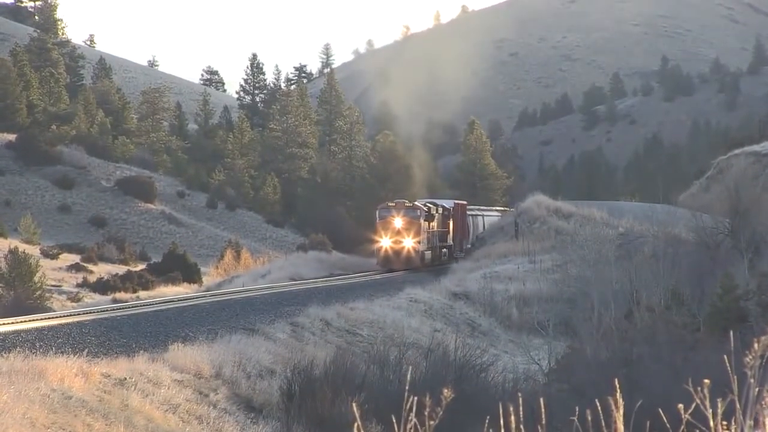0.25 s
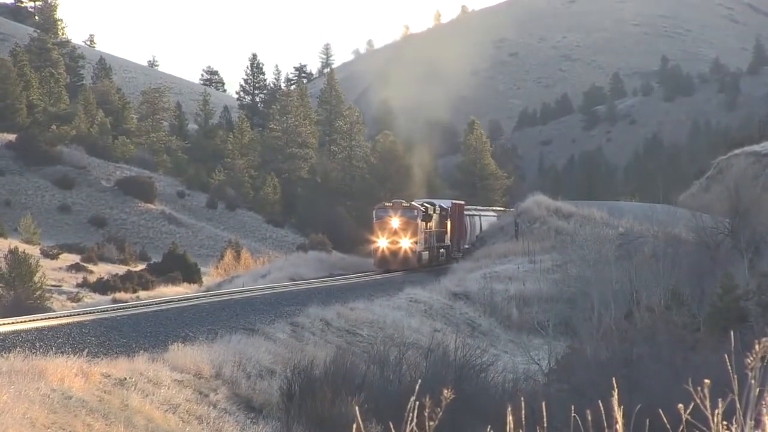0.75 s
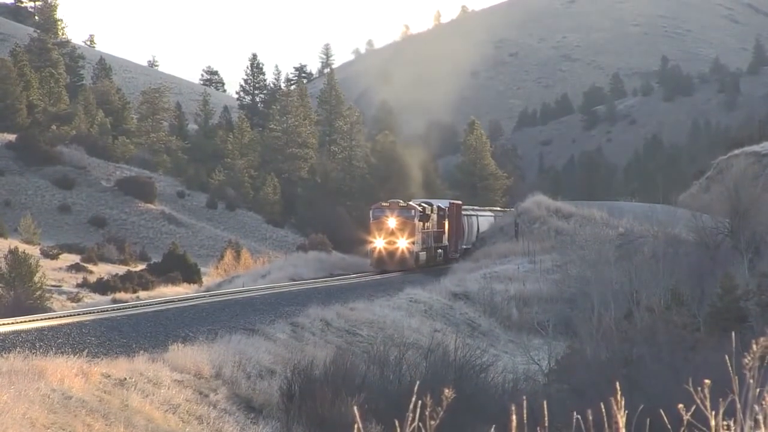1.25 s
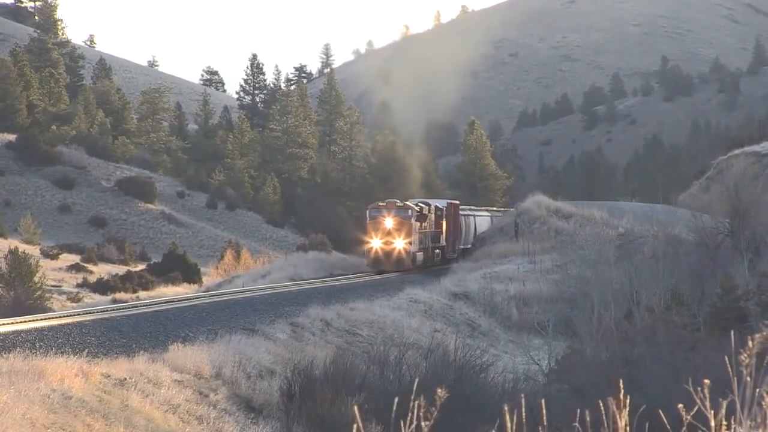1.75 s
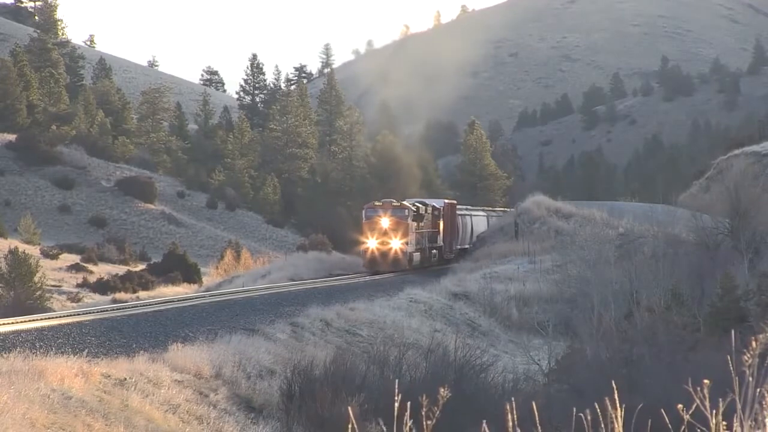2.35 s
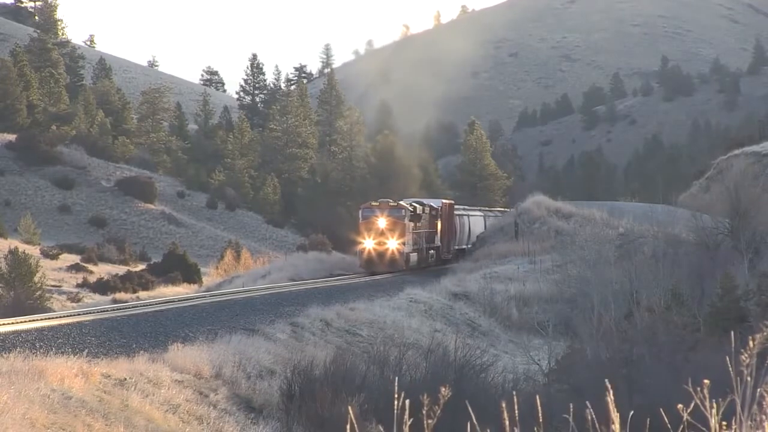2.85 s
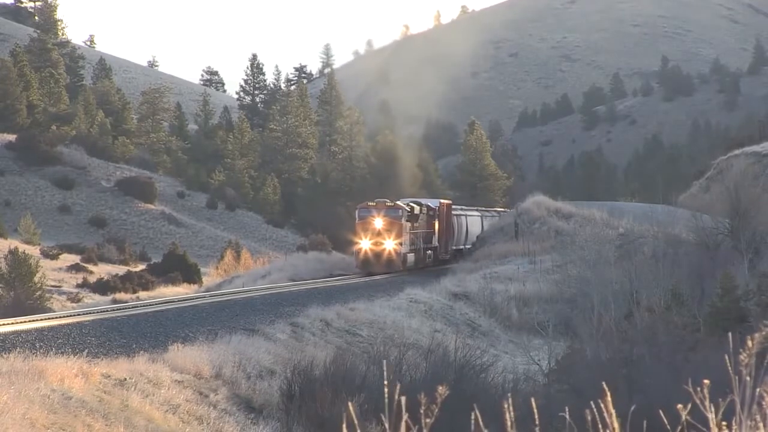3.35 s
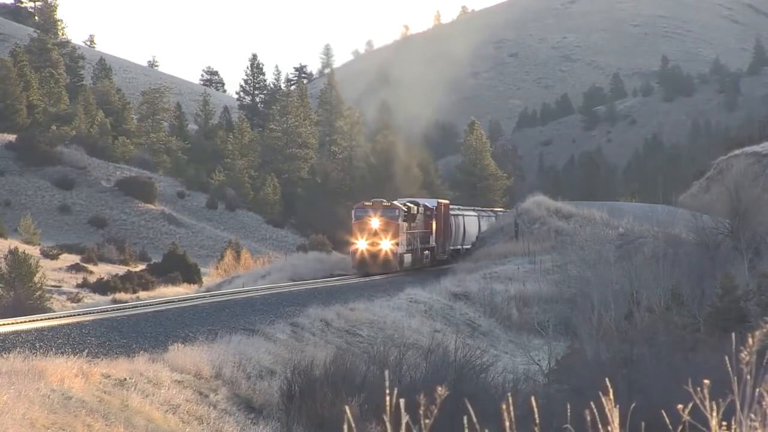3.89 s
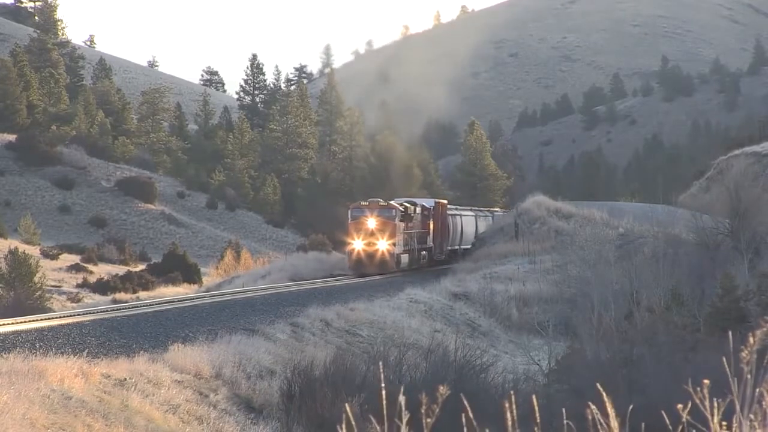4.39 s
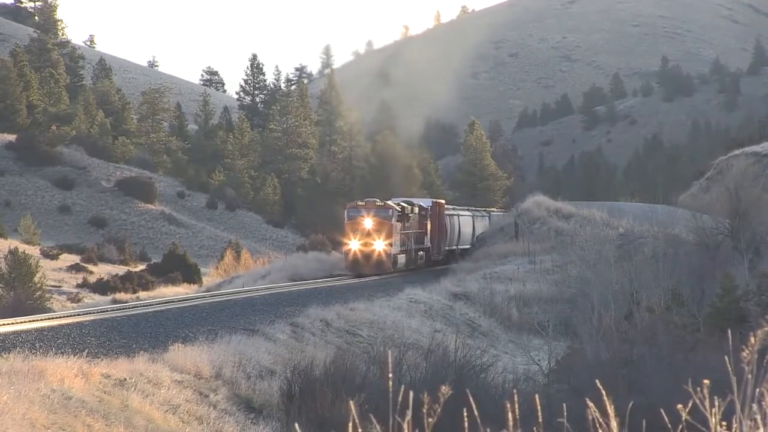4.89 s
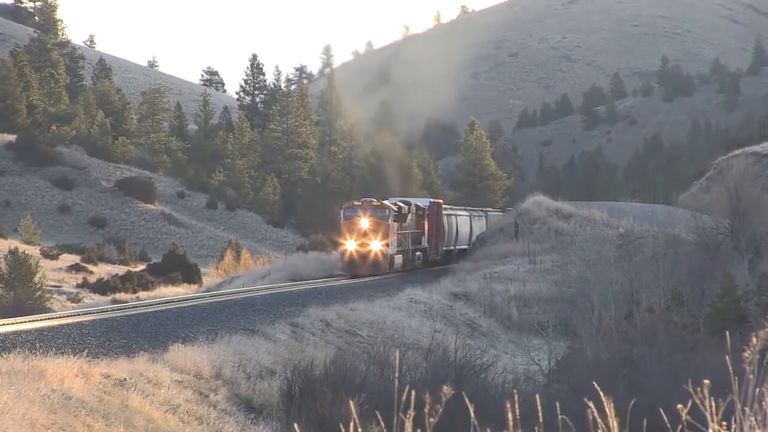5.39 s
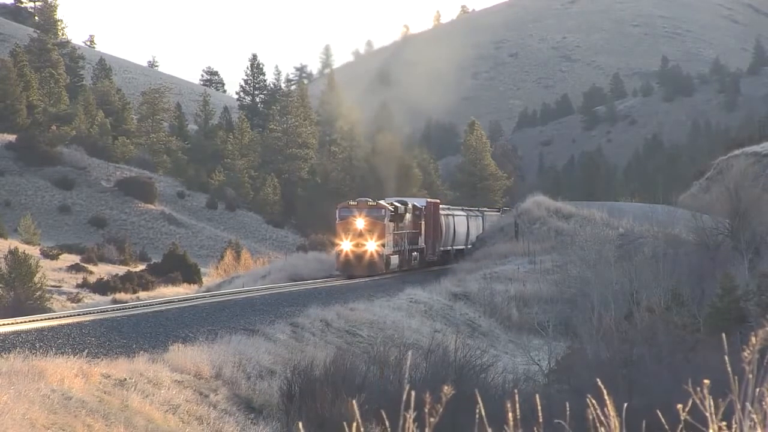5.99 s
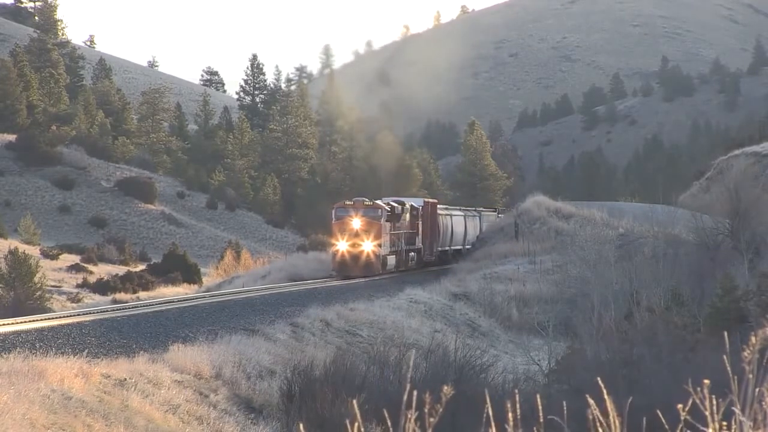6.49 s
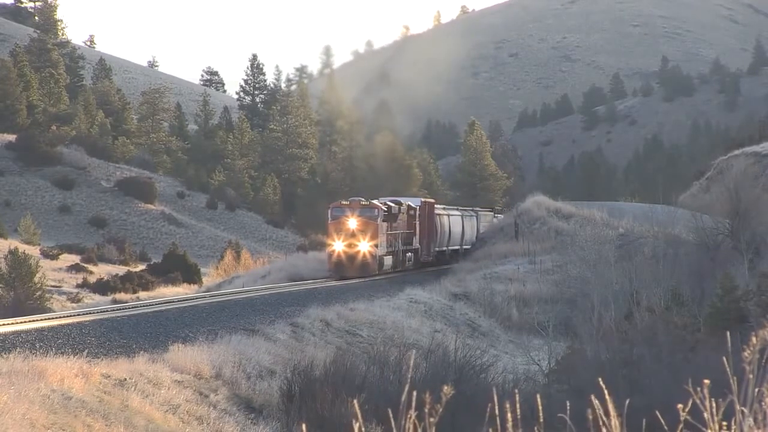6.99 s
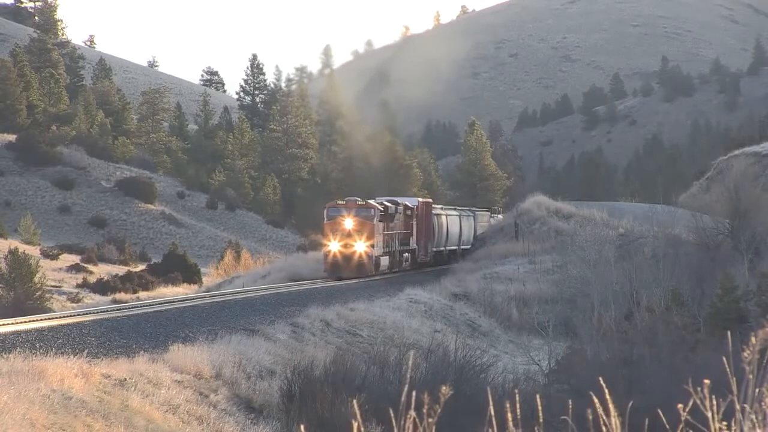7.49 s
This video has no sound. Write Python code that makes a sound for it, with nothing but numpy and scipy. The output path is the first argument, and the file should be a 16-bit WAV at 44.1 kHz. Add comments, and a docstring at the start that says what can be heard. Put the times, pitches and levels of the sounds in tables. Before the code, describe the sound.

Outdoors in an open dry valley, distant diesel locomotives pull hard, giving a continuous low throbbing drone and broad breathy exhaust roar that slowly swells. A thin wavering whine comes and goes. Dry grass rustles softly near the microphone, mostly in the first two seconds, with a sharp stalk tick just before two. A small bird trills around three seconds.

```python
"""Diesel freight locomotives at full throttle climb slowly nearer through a dry valley, far from the microphone.
From the start, uneven firings give clean low orders under a broad exhaust roar of noise bands with two echoes,
a wavering sine makes a thin whine, and close by noise gusts rustle in dry grass.
From 1.4 s stalks tick as short clicks; from 1.5 s the first echo gap in the roar climbs.
Around 3 s a small bird trills in gliding sines; two faint high chips follow near 6 and 7 s."""
import sys
import numpy as np
from scipy import signal
from scipy.fft import rfft, irfft, next_fast_len
from scipy.io import wavfile
from scipy.ndimage import uniform_filter1d

SR = 44100
rng = np.random.default_rng(int(sys.argv[2]) if len(sys.argv) > 2 else 0)


def wrap_up_sound(samples):
    """Save the sound to the file named by the first command line argument, as 16-bit audio."""
    columns = np.atleast_2d(samples).T
    # keep every value between -1 and 1, then stretch to whole-number steps
    tamed = np.clip(columns, -1, 1)
    steps = np.round(tamed * 32767).astype(np.int16)
    wavfile.write(sys.argv[1], SR, steps)


N = 341334
T = np.arange(N) / SR
CYCLE_HZ = 8.9259  # four-stroke cycles a second as they arrive


def undb(db):
    """Decibels to gain."""
    return 10 ** (np.asarray(db) / 20)


def columns(table):
    """Every column after the first, drawn out along the time axis."""
    times, *rest = np.transpose(table)
    return [np.interp(T, times, column) for column in rest]


def walk(rate_hz):
    """Random levels held 1 / rate_hz seconds and slewed twice; spread near 1."""
    steps = 16
    held = np.repeat(rng.standard_normal(int(N / SR * rate_hz) + 2), steps)
    slewed = uniform_filter1d(uniform_filter1d(held, size=steps), size=steps)
    return np.interp(T * rate_hz * steps, np.arange(len(held)), slewed) * 4 / 3


def bump(middle_s, before_s, after_s):
    """A smooth swell from 0 to 1 at middle_s and back."""
    distance = np.where(T < middle_s, (middle_s - T) / before_s, (T - middle_s) / after_s)
    return np.cos(np.pi / 2 * np.clip(distance, 0, 1)) ** 2


def noise_bands(colour, count):
    """Overlapping bands, count an octave, of one coloured noise, as (centre Hz, sound); together they have rms 1."""
    size = next_fast_len(N)
    octave = np.log2(np.maximum(np.arange(size // 2 + 1), 1) * SR / size)
    hz, db = np.transpose(colour)
    tint = undb(np.interp(octave, np.log2(hz), db, left=-90, right=-90))
    spectrum = rfft(rng.standard_normal(size)) * tint
    spectrum /= np.std(irfft(spectrum, size))
    for centre in np.arange(np.log2(hz[0]), np.log2(hz[-1]) + 1 / count, 1 / count):
        window = np.clip(1 - abs(octave - centre) * count, 0, 1)
        yield 2 ** centre, irfft(spectrum * window, size)[:N]


# twelve cylinders, two banks of six: place of the puff in the cycle/0-1, level/dB
CYLINDER_PUFFS = [(.0852, -3), (.1314, .4), (.2471, 1.9), (.3013, -2.9), (.415, -3.5), (.4612, -3.7),
                  (.5825, 3.8), (.6275, -7.5), (.7468, 2.6), (.7924, 2.4), (.9217, 5.5), (.965, 3.9)]
# resonances that shape the balance and timing of the engine orders: f/Hz, width/Hz, level/dB, sign
ORDER_RESONANCES = [(35, 74.3, -32.6, 1), (79.6, 19.4, -11.6, -1), (131.4, 8, -6.8, 1),
                    (169.7, 8, -18.8, 1), (191.3, 14.8, -23.1, -1), (234.4, 8, -28.7, -1)]
BASS_CUT_HZ = 45  # the engine sound thins out below this


def order(k):
    """Size and timing of multiple k of the cycle: all twelve puffs summed, then shaped by the resonances."""
    place, strength_db = np.transpose(CYLINDER_PUFFS)
    hz = k * CYCLE_HZ
    puffs = undb(strength_db) @ np.exp(-2j * np.pi * k * place)
    shape = 0
    for f, width, db, sign in ORDER_RESONANCES:
        damping = 1j * hz * width
        shape = shape + sign * undb(db) * damping / (f * f - hz * hz + damping)
    low = 1j * hz / BASS_CUT_HZ
    bass_cut = low ** 2 / (1 + np.sqrt(2) * low + low ** 2)
    return puffs * shape * bass_cut


# the train draws nearer, drive of order 15 ahead of the resonances: t/s, level/dB
APPROACH_LEVEL = [(0, -39.5), (1.1, -37.5), (1.6, -38), (2.05, -38), (2.5, -36.5), (2.9, -35), (4.2, -34.5),
                  (4.7, -34.5), (5.6, -35), (6.4, -34.5), (7.74, -33.5)]
# single orders fade or swell for a while: middle t/s, time each way/s, level/dB
ORDER_FADES = [(1.1, .8, -7), (1.3, 1.3, -7.5), (2.6, 0.85, -2), (1.9, 1.9, 4.5), (5.4, 0.43, -6),
               (7.3, 1, 8), (2.5, 0.83, -6.5), (7.5, 1.1, -8), (0.79, 1.4, 1), (2.7, 1.1, -4.5)]
# the multiple of the cycle that each row of fades acts on: order
FADED_ORDERS = (9, 11, 6, 8, 11, 8, 13, 13, 16, 14)
ORDERS_HEARD = range(3, 31)
OPEN_DB = -33  # drive of order 15 at which all orders keep the balance set by puffs and resonances
FULL_RISE_ORDER, RISE_POWER = 14, 0.97  # orders below this one gain less as the train comes out into the open
WAVER_DB = .5  # how much order 15 wavers


def engine(cycle, waver_rad=0.055):
    """Twelve uneven firings a cycle sound as steady orders that grow as the train nears."""
    near_db, = columns(APPROACH_LEVEL)
    out = 0
    for k in ORDERS_HEARD:
        rise_share = min(k / FULL_RISE_ORDER, 1) ** RISE_POWER
        level_db = OPEN_DB + (near_db - OPEN_DB) * rise_share
        for faded, (middle_s, each_way_s, db) in zip(FADED_ORDERS, ORDER_FADES):
            if faded == k:
                level_db = level_db + db * bump(middle_s, each_way_s, each_way_s)
        # air on the long path makes each order waver, the higher ones more
        level_db = level_db + WAVER_DB * k / 15 * walk(2.984)
        phase = 2 * np.pi * k * cycle + waver_rad * k / 15 * walk(4.4)
        source = order(k)
        out = out + np.sqrt(2) * undb(level_db) * abs(source) * np.cos(phase + np.angle(source))
    return out


# moves of the roar: t/s, level/dB re its steady rise, then re that level: treble/dB and
# the bands near 1200, 1800, 720 and 540 Hz/dB; strength of first and second echo/0-1
ROAR_MOVES = [(0, -1.8, -0.5, 1.5, -3, 0.5, -2, 0.48, 0.36), (.2, -.5, -2, 1, -1, -0.5, 2, 0.74, .34),
              (.38, -0.1, 1.5, 1.5, 2, 2, 0.5, 0.54, .35), (.52, 0.4, -.5, 1, -2, 4, -6, .6, .36),
              (.7, -0.5, -1, 0.5, -0.5, 2, -3.5, 0.46, .37), (1.1, -0.9, -2.5, 1, -2, 1, 2.5, 0.51, 0.37),
              (1.4, -0.43, -1, 0, -1.5, 2, -2, 0.59, 0.37), (1.8, -0.3, -3.5, 2, -1, 0, -1.1, 0.42, 0.31),
              (2.2, -0.6, -0.5, 4, -0.5, 0.5, 0.5, 0.2, .25), (2.5, -1.5, -1, 3.5, -2, 0, -3, 0.42, 0.21),
              (2.68, -1.2, 2.5, 2, -1, 0.5, -1, .3, 0.24), (2.87, -1.2, 1.5, -1, -1, 1, -1.5, 0.3, 0.26),
              (3.05, -1.4, -4, 1.5, 1.5, -0.5, 0, .22, .23), (3.6, -1.5, -3, 1, -1, 0, -2.5, .33, .23),
              (4.0, -2.5, -2, 3.5, 0, 3.5, -3, 0.43, .15), (4.45, -1.3, -2, 2, -1, 2, -3, 0.47, .11),
              (4.9, -1.5, -5, 4, 1.5, 0.5, -1, 0.3, .12), (5.3, -0.63, -1.5, 0.5, 3, -1, 1.6, 0.49, .16),
              (6, -0.3, -3, -2, -1.5, -1, 1, 0.39, 0.34), (6.8, 0.1, -4, 0.5, -2.5, -4, 1.5, 0.27, .38),
              (7.74, 1.1, -3, -2, -1, -6, 1.5, .27, 0.26)]
# the top of the roar, near 4500 Hz, swells on its own: t/s, level/dB
ROAR_TOP_SWELL = [(0, 0), (.3, -1), (.8, 1.5), (1.4, -1.5), (1.85, 2), (2.15, -3.5), (2.5, 2), (2.8, -1),
                  (3.2, 1.5), (3.6, 0.5), (3.9, 3.5), (4.4, 2), (4.9, 1), (5.4, 0), (6, 0), (6.8, 0.5),
                  (7.3, -1.5), (7.74, 3)]
# bands that swell on their own, the top one last: f/Hz, width/octaves
SWELLING_BANDS = [(1230, 0.17), (1780, 0.21), (710, 0.16), (546, 0.12), (4500, .2)]
# colour of the roar: f/Hz, level/dB per Hz
ROAR_COLOUR = [(25, -25), (45, -10.5), (70, 2.5), (130, 1.5), (170, 0), (230, 0), (310, -6.5), (520, -8.5),
               (800, -14.5), (1100, -19), (1300, -19.5), (1600, -24.5), (2200, -28), (3000, -32),
               (3800, -37), (4500, -41), (5000, -47), (5500, -55), (7000, -74.5)]
ROAR_DB, ROAR_RISE_DB_S = -43, 0.4  # level at the start ahead of moves and echoes, and its rise
# first gap, cut by the ground echo; it climbs once the train rounds the bend
GAP_HZ, GAP_RISE_HZ_S, GAP_STARTS_S = 488, 124, 1.52
# a second echo, whose gap sinks to a floor
SECOND_GAP_HZ, SECOND_FALL_HZ_S, SECOND_STARTS_S, SECOND_LOW_HZ = 1200, 164, 0.62, 412


def roar(cycle, flicker_db=1.74, puff=0.083, treble_hz=1720.0, mirror_hz=253.0, reach=1.4,
         second_reach=1.3, second_floor=0.39, surge_db=0.6, calm_hz=1500.):
    """Exhaust gas and fans, pulsing a little with the firings, heard directly and again off ground and slope."""
    swell_db, treble_db, *bands_db, strength, second_strength = columns(ROAR_MOVES)
    bands_db = bands_db + columns(ROAR_TOP_SWELL)
    gap_hz = GAP_HZ + GAP_RISE_HZ_S * np.maximum(T - GAP_STARTS_S, 0)
    second_fall_hz = SECOND_FALL_HZ_S * np.maximum(T - SECOND_STARTS_S, 0)
    second_hz = np.maximum(SECOND_GAP_HZ - second_fall_hz, SECOND_LOW_HZ)
    treble_db = treble_db + surge_db * walk(7.0)  # the whole treble surges together
    direct, ground, slope = 0, 0, 0
    for hz, band in noise_bands(ROAR_COLOUR, count=8):
        band_db = treble_db / (1 + (treble_hz / hz) ** 4)
        # each band flickers by itself, less above calm_hz
        band_db = band_db + flicker_db * walk(4.0) * min(calm_hz / hz, 1) ** .5
        for db, (f, width) in zip(bands_db, SWELLING_BANDS):
            band_db = band_db + db * np.exp(-.5 * (np.log2(hz / f) / width) ** 2)
        band = undb(band_db) * band
        direct = direct + band
        # only the middle of the spectrum is mirrored; higher up turbulence blurs the echoes
        mirrored = band / (1 + (mirror_hz / hz) ** 4)
        ground = ground + mirrored / (1 + (hz / (reach * gap_hz)) ** 6)
        slope_top = 1 + (hz / (second_reach * second_hz)) ** 6
        slope_bottom = 1 + (second_floor * second_hz / hz) ** 6
        slope = slope + mirrored / slope_top / slope_bottom
    # grazing echoes are inverted: each cuts a gap where its lag is one period and lifts the bands on either side
    echo = np.clip(strength, 0, 1) * np.interp(T - 1 / gap_hz, T, ground)
    echo = echo + np.clip(second_strength, 0, 1) * np.interp(T - 1 / second_hz, T, slope)
    pulsing = 1 + puff * (np.cos(2 * np.pi * 3 * cycle) + np.cos(2 * np.pi * 6 * cycle))
    return undb(ROAR_DB + ROAR_RISE_DB_S * T + swell_db) * pulsing * (direct - echo)


# level of the whine ahead of its flicker: t/s, level/dB
WHINE_LEVEL = [(0, -77), (.5, -70.5), (1.2, -80), (1.6, -74), (1.9, -75), (2.35, -74), (2.65, -68),
               (3.1, -81), (3.35, -68.5), (3.6, -76), (4.1, -67), (5.65, -66.5), (6.2, -71.5), (6.6, -70),
               (7.0, -68.5), (7.74, -72)]
WHINE_HZ = 1482.5


def whine(flicker_db=2.5, waver_hz=2.5):
    """A thin gear or blower tone, one sine with wavering pitch, that comes and goes."""
    hz = WHINE_HZ + waver_hz * walk(3.0)
    level_db = columns(WHINE_LEVEL)[0] + flicker_db * walk(8.0)
    return np.sqrt(2) * undb(level_db) * np.sin(2 * np.pi * np.cumsum(hz) / SR)


# gusts in the grass, ahead of gain and tilt: loudest t/s, length/s, peak level/dB
GRASS_GUSTS = [(.01, .2, -84), (0.34, .36, -81.5), (.5, .1, -84.5), (1.06, .24, -80.5), (1.175, .19, -74.5),
               (1.27, .14, -83.5), (1.542, .25, -85.5), (1.81, 0.051, -83), (2.18, 0.3, -84),
               (2.42, .16, -85), (3.585, 0.18, -84), (3.763, 0.23, -87.5), (4.23, 0.22, -86),
               (4.83, .08, -88), (5.55, .3, -92)]
# colour of the rustle: f/Hz, level/dB per Hz
RUSTLE_COLOUR = [(2500, -15.5), (4000, 6), (6000, 3), (7500, 1.5), (9500, -0.5), (12000, -1), (13500, -8),
                 (15500, -11.5)]
# snapping stalks: t/s, peak level/dB
STALK_TICKS = [(1.445, -62), (1.7843, -41), (1.7965, -55), (1.7997, -45), (1.8007, -54), (1.802, -51),
               (1.804, -59), (2.85, -60), (3.44, -66), (3.499, -60), (3.57, -66), (4.245, -67),
               (4.309, -60)]
GUST_RISE = .55  # share of a gust spent swelling
# ahead of the gain: rustle between the gusts, how it dies down, and the even hiss that stays
GRASS_DB, GRASS_SETTLES_DB_S, AIR_DB = -87, -1.5, -88.7


def grass(gain_db=3.5, top_hz=12000., brighten=.55, flicker_db=2.1, tick_s=0.00019, rattle=0.3, heel=.3):
    """Dry stalks rustle as flickering noise in short gusts and now and then one snaps."""
    power = undb(GRASS_DB + GRASS_SETTLES_DB_S * T) ** 2
    for loudest_s, length_s, db in GRASS_GUSTS:
        gust = bump(loudest_s, GUST_RISE * length_s, (1 - GUST_RISE) * length_s)
        power = power + undb(db) ** 2 * gust
    total_power = power + undb(AIR_DB) ** 2
    stirring = power / total_power  # only the stalks flicker
    level_db = 10 * np.log10(total_power)
    out = 0
    for hz, band in noise_bands(RUSTLE_COLOUR, count=3):
        # the rustle's top is set brighter when it is louder
        tilt_db = brighten * (level_db - level_db.mean()) / (1 + (top_hz / hz) ** 8)
        band_db = level_db + gain_db + tilt_db + flicker_db * stirring * walk(24.0)
        out = out + undb(band_db) * band
    tail = np.exp(-T[:256] / tick_s)
    cracks = rng.standard_normal((len(STALK_TICKS), 256))
    for (tick_at_s, db), crack in zip(STALK_TICKS, cracks):
        # a sharp break, then a brief rattle
        snap = rattle * crack * tail
        snap[:2] = -1, -heel
        first = int(tick_at_s * SR)
        out[first:first + 256] += undb(db) * snap
    return out


# notes of the bird: middle t/s, peak level/dB, length/s, top f/Hz
BIRD_NOTES = [(2.685, -79, .031, 7540), (2.822, -79, .034, 7400), (2.907, -83, .03, 7500),
              (2.999, -74, 0.03, 7160), (3.091, -75, .032, 7360), (3.179, -76, .034, 7450),
              (3.273, -71.5, 0.03, 7300), (3.364, -71.5, .032, 7400), (3.458, -73.5, .032, 7500),
              (5.868, -78, 0.01, 10600), (6.93, -79.5, .01, 10200)]
BIRD_FALL, BIRD_PICKUP = 0.64, .86  # shares of the top: notes fall to the one; the first note rises from the other
BIRD_BEND = 1.6  # the glide steepens towards its end


def bird():
    """One rising note, a trill of quick falling whistles, later two faint high chips, all gliding sines."""
    out = np.zeros(N)
    for i, (middle_s, db, length_s, top_hz) in enumerate(BIRD_NOTES):
        start, end = (1, BIRD_FALL) if i else (BIRD_PICKUP, 1)
        n = int(length_s * SR)
        hz = top_hz * (start + (end - start) * np.linspace(0, 1, n) ** BIRD_BEND)
        whistle = np.sin(2 * np.pi * np.cumsum(hz) / SR)
        first = int(middle_s * SR) - n // 2
        out[first:first + n] += undb(db) * np.hanning(n) ** 1.1 * whistle
    return out


def scene():
    """The train far off, grass and bird near."""
    cycle = CYCLE_HZ * T
    train = engine(cycle) + roar(cycle) + whine()
    return (train + grass() + bird())[None]


TOP_HZ = 15700


def record(dry):
    """The recorder cuts the top steeply, filtering forwards and backwards so that no phase shifts."""
    top_cut = signal.ellip(8, .1, 40, TOP_HZ, fs=SR, output="sos")
    return signal.sosfiltfilt(top_cut, dry)


dry = scene()
out = record(dry)
wrap_up_sound(out)
```